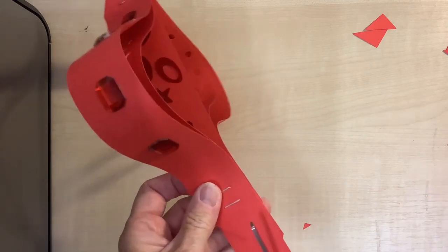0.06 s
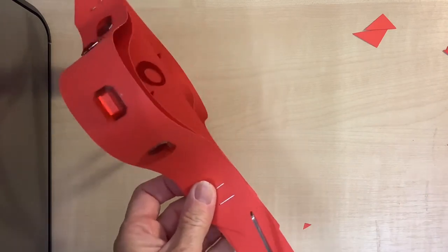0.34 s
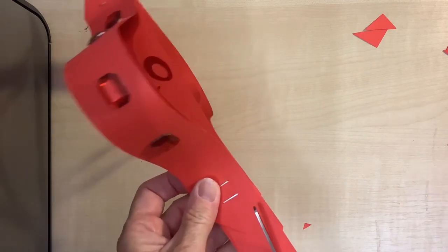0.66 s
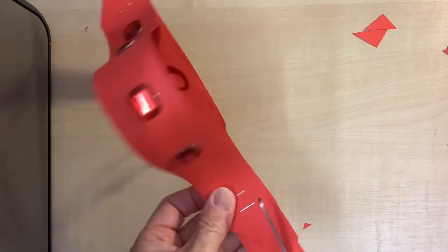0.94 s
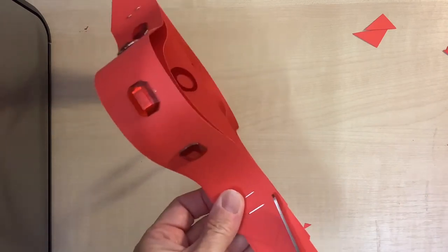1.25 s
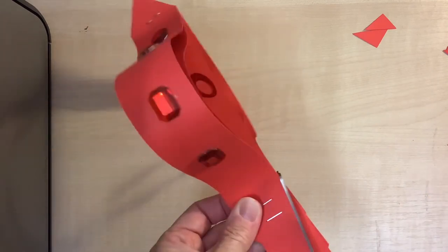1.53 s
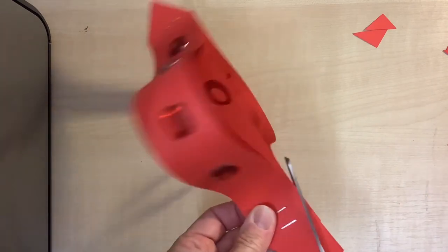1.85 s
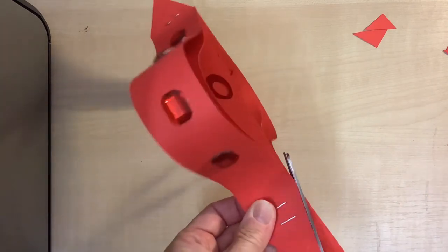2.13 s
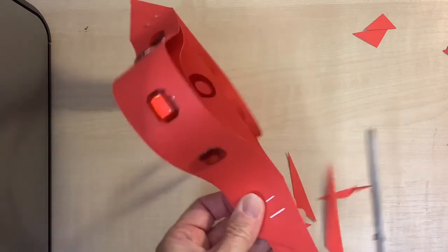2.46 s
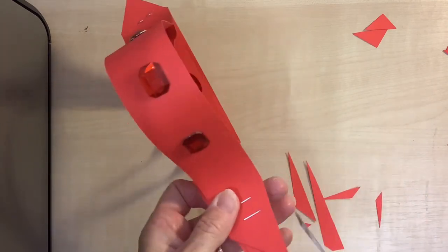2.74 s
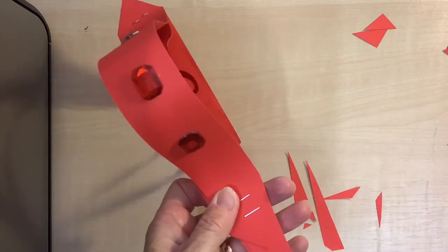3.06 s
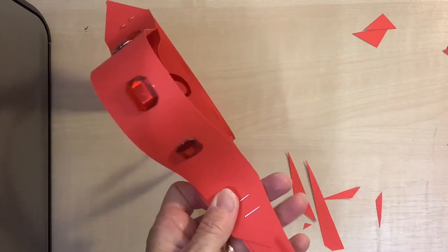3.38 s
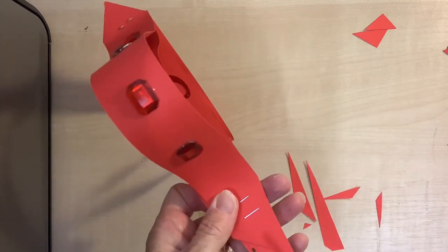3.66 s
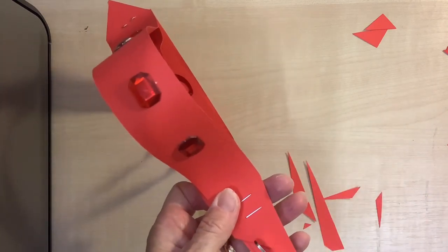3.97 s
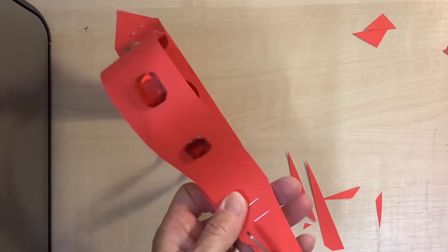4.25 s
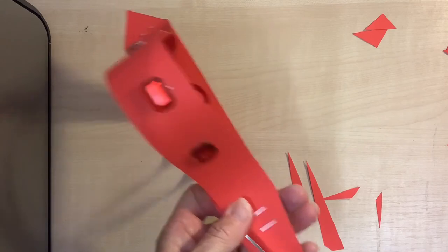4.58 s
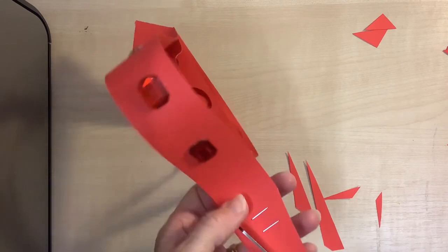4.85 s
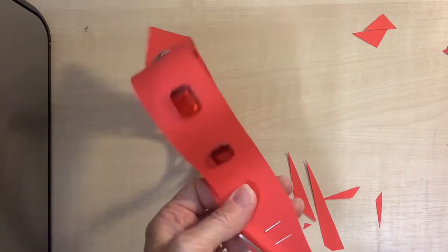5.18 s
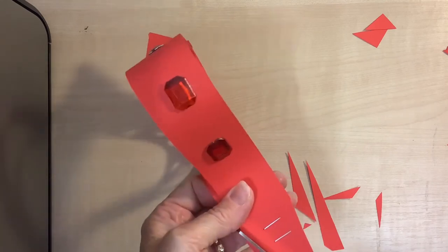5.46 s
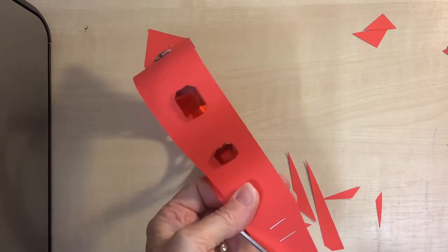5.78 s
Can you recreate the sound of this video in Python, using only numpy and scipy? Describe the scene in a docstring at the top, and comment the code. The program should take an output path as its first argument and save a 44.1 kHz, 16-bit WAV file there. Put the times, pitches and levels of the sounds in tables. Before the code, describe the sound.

Faint, crisp scissor cuts through card and soft finger rubbing, broken by two pairs of sharp metallic clicks, close by.

```python
"""Fingers slide softly over stiff card; then scissors work through it, close by, in a small quiet room.
The rubbing is friction noise, and each cut is a dense stream of fibres failing in shear; both excite
the card's resonances, as does one long, hissing rub between cuts. Stored strain escapes in uneven snaps,
stick-slip motion gives short squeaks, and the hand bumps the card. Twice the blades clack shut and click
open: impacts that set the steel ringing. The walls return a faint tail over a low murmur of air."""
import sys
import numpy as np
from scipy import signal
from scipy.fft import rfft, irfft, next_fast_len
from scipy.io import wavfile
from scipy.ndimage import map_coordinates

SR = 44100
rng = np.random.default_rng(int(sys.argv[2]) if len(sys.argv) > 2 else 0)


def int16_out(signal):
    """Quantize to a 16-bit WAV file."""
    q = np.round(np.clip(np.atleast_2d(signal).T, -1, 1) * 32767)
    wavfile.write(sys.argv[1], SR, q.astype(np.int16))


N = 256220

# Table levels are relative; body (low band) and hiss (high band) are offsets from the event's level.
# finger slides: t/s, rise/s, fall/s, level at full speed/dB, hiss/dB
SLIDES = [(0.0, 0.057, 0.14, -58.5, -8.5), (0.22, 0.007, 0.054, -60, -8), (0.29, 0.087, 0.13, -61, -1.5),
          (1.612, 0.016, 0.0069, -62, -24), (1.986, 0.14, 0.042, -65, -4), (2.2, 0.17, 0.028, -64.5, -8),
          (2.634, 0.034, 0.037, -73.5, -7.5), (3.058, 0.069, .17, -68, -1),
          (3.263, 0.024, 0.023, -71, -32.5), (3.311, 0.15, 0.008, -66.5, -5.5),
          (3.53, 0.055, .01, -74, -17), (3.6, 0.13, 0.063, -70.5, -2), (4.714, 0.027, 0.055, -65, -12),
          (4.955, .055, 0.0098, -65, -12), (5.63, 0.043, 0.022, -58, -6)]
# spectrum of skin rubbing on card: f/Hz, level/dB
SKIN_SPECTRUM = [(240, -36), (400, -12.5), (607, -4), (765, -11), (1380, -3), (1870, -12.5), (2750, -5),
                 (4110, -3), (4440, -5.5), (6540, -7), (9180, -11), (14800, -20.5), (16000, -22.5)]
# resonances of the card under the fingers: f/Hz, bandwidth/Hz, level/dB
HELD_CARD_MODES = [(2600, 260, -10), (4670, 140, 9.5), (5710, 420, -6.5), (8400, 200, -10.5),
                   (8900, 650, -7.5)]
# bumps of the hand on the card: t/s, level/dB
BUMPS = [(0.188, -53.5), (1.749, -52.5), (2.022, -60.5), (2.135, -43.5), (5.505, -48.5)]
# spectrum of a bump: f/Hz, level/dB
BUMP_SPECTRUM = [(35, -18), (60, -10.5), (110, -5), (300, -5), (750, -3), (1200, -14.5), (3000, -37)]
# cutting strokes, and at 3.64 s one long, soft, hissing rub of blade or fingers on the card:
# t/s, rise/s, fall/s, onset/dB re full speed, level at full speed/dB, body/dB, hiss/dB,
# tick as the contact seats/dB re level
CUTS_AND_RUB = [(0.51, 0.056, 0.018, -5, -59, -7, 2, -33), (0.603, .035, 0.015, -6, -54.5, -4, -2, -0.5),
                (0.75, 0.047, 0.12, -6, -50, -10, -2.5, -19),
                (1.011, 0.055, 0.064, -2, -47.5, -7.5, -7, -12),
                (1.272, 0.061, 0.045, -10, -47, -13.5, -3, -26),
                (1.386, .075, 0.024, -6, -61.5, -15, -8, -22),
                (1.511, 0.04, 0.032, 10.5, -55.5, -14.5, -14, -12),
                (1.71, 0.069, 0.013, -1.5, -45, -13, -7.5, -27),
                (1.851, 0.096, 0.011, -5, -61, -16, -5.5, -20),
                (2.352, 0.068, 0.013, -8.5, -56, -11, -1.5, -20),
                (2.529, 0.041, 0.018, -8.5, -56.5, -11.5, -8, -10.5),
                (3.64, 0.22, 0.017, -16.5, -60, -12.5, 4.5, -31),
                (4.018, 0.085, 0.021, -10, -49, -14.5, -2, -22),
                (4.211, 0.057, 0.074, -13, -50.5, -11.5, 0, -13),
                (4.493, 0.064, 0.0119, -4, -46.5, -12, 0, -30),
                (4.581, 0.038, 0.039, -8, -61.5, -7, -8, -22.5),
                (4.785, .055, 0.067, -4, -53.5, -19, -3, -15),
                (5.056, 0.037, 0.051, -6.5, -45.5, -12.5, -0.5, -18)]
# spectrum of the cuts and the long rub: f/Hz, level/dB
CUT_AND_RUB_SPECTRUM = [(120, -67), (200, -14.5), (432, -14.5), (560, -9), (850, -8.5), (1150, -6.5),
                        (1560, -9.5), (1710, -8.5), (2050, -10.5), (2560, 0), (3020, -8), (3190, 0),
                        (5840, 0), (6520, -3.5), (13300, -10), (16000, -21)]
# resonances of the card between the blades: f/Hz, bandwidth/Hz, level/dB
CARD_MODES = [(1837, 20, 13), (2520, 43, 2.5), (3300, 20, 3), (3960, 38, -3), (4303, 320, 9.5),
              (4890, 480, 25), (5920, 170, 18), (6920, 98, -17), (7806, 190, 7), (8700, 87, -2),
              (9850, 75, -3.5), (10570, 24, 1.5)]
# the card gives way: t/s, level/dB, body/dB, hiss/dB, number of jerks in the run
SNAPS = [(0.609, -50.5, -4, -4, 1), (0.621, -46.5, -3.5, -4, 2), (0.6659, -56, -5, 0.5, 1),
         (0.9352, -54.5, 4, 1.5, 1), (1.02, -46, -5.5, -7, 1), (1.048, -40, -3, -4.5, 1),
         (1.081, -44, -12, -8, 1), (1.1152, -42.5, -7, -6, 2), (1.151, -44, -0.5, -4.5, 1),
         (1.267, -49.5, -11, -6, 1), (1.418, -56.5, -17, -5, 1), (1.455, -48, -7.5, -4, 2),
         (1.4872, -51.5, -21, -6, 1), (1.5105, -45, -11, -5, 1), (1.537, -43.5, -4.5, 0, 4),
         (1.7019, -49.5, -29, -6, 1), (1.745, -35, -1, -8, 1), (1.761, -45, -9, 4, 1),
         (1.8385, -52, -13, -13, 1), (1.9096, -47.5, -6.5, -7, 1), (1.9261, -45.5, -10, -5, 1),
         (1.9747, -39.5, -5.5, -6, 1), (2.0229, -35, -6, -11, 1), (2.0635, -43.5, -7, -6, 1),
         (2.107, -56, -22, -11, 1), (2.127, -37, -24, -10, 1), (2.2338, -56.5, -18, -13, 1),
         (2.272, -51.5, -10.5, -2, 1), (2.2983, -64, -5, 13, 1), (2.399, -46, -11.5, -18, 1),
         (2.564, -48, -13, -8, 1), (2.6674, -65, -4, -11, 1), (2.777, -76, -8, -16, 1),
         (3.845, -53, -6.5, 3, 1), (3.862, -54, -2.5, 0, 1), (4.0166, -50.5, -12.5, -5, 1),
         (4.3165, -48, -4, -11, 1), (4.329, -42, -9, -8, 1), (4.604, -50, -5.5, -2.5, 1),
         (4.693, -50, -1.5, -1.5, 1), (5.059, -52.5, 5, -3, 1), (5.233, -49, -9.5, -9, 1),
         (5.257, -62, -5, -22, 1), (5.3279, -46.5, -2, -3.5, 1), (5.3502, -49.5, -3, 1, 1),
         (5.3794, -46.5, -5, 2.5, 1), (5.386, -47, 0, 4, 1), (5.4183, -41.5, 2.5, -0.5, 4),
         (5.482, -44, -5, -10, 1), (5.4868, -37, -1, -8, 1), (5.666, -53, -15, 5, 1),
         (5.711, -59.5, -2.5, -12, 1), (5.757, -54, 1, -5, 1)]
# spectrum of a snap: f/Hz, level/dB
SNAP_SPECTRUM = [(120, -39), (200, -5.5), (340, -14), (600, 0.5), (1300, -1), (2050, -9), (2510, 0),
                 (4430, 3.5), (4950, 3), (5730, 0), (6520, -2.5), (8580, -3), (12200, -11), (13100, -10),
                 (16000, -16.5)]
# the card catches on a blade: t/s, f/Hz, level/dB, duration/s
SQUEAKS = [(0.933, 2940, -45, 0.0036), (1.008, 1710, -56, 0.023), (1.048, 1790, -45.5, 0.014),
           (1.151, 1350, -49, 0.0063), (1.745, 1120, -33.5, 0.0044), (3.281, 4370, -65, 0.023),
           (5.066, 1083, -50.5, 0.017), (5.255, 1610, -57, 0.0023), (5.768, 2560, -41.5, 0.00073)]
# the blades clack shut: t/s, level/dB, body/dB, hiss/dB, ring/dB, contact time/s
SHUTS = [(2.1323, -14.5, -3, -1, -5, 0.0012), (5.5018, -17.5, -4, -4.5, -11.5, 0.0031)]
# spectrum of the clack: f/Hz, level/dB
CLACK_SPECTRUM = [(71, -75), (120, -27.5), (348, -26), (680, -1), (1430, -5.5), (1580, -25), (1750, -8.5),
                  (3170, -7), (3380, -2), (3660, -13), (5410, 1.5), (6370, -5.5), (6910, -7.5), (11800, -5),
                  (16000, -10.5)]
# modes of the closed scissors: f/Hz, level/dB, t60 before the hand's damping/s
CLOSED_MODES = [(978, -5.5, 0.069), (2500, -5, .05), (3416, -3, 0.045), (4306, 0.5, .07), (4806, -2.5, .07),
                (5100, -10.5, .06), (5250, -4, .06), (5660, -1.5, .07), (5530, -4, .06),
                (6250, -2.5, 0.056), (7180, 1, .05), (8500, -1.5, .07), (8660, -4, .06), (9340, -3, .07),
                (8930, 2, .05), (9700, -8.5, .05), (11100, -1.5, .05)]
# the blades click apart: t/s, level/dB, body/dB, hiss/dB, ring/dB, contact time/s
PARTINGS = [(2.3107, -10, -3, -8, -11.5, 0.0011), (5.7802, -9, -0.5, -7.5, -10.5, 0.0021)]
# spectrum of the click: f/Hz, level/dB
CLICK_SPECTRUM = [(150, -72), (250, -32), (1400, -22), (1820, -11), (2200, -24), (2670, -9.5), (3460, -19),
                  (4820, -5), (5250, -14.5), (6080, -4.5), (6600, -20), (8850, -1), (9660, -13),
                  (14400, -4.5), (16000, 6)]
# modes of the parted scissors: f/Hz, level/dB, t60 before the hand's damping/s
PARTED_MODES = [(2586, -5, 0.01), (2940, -6, 0.025), (4784, -4, 0.039), (5680, -16, 0.055),
                (6100, -7, 0.028), (6850, -4, 0.02), (8710, -7, 0.019), (10230, -8, 0.023),
                (13200, -13, 0.064), (15000, -18, 0.03), (14810, -20, 0.03)]
# reverberation time of the room: f/Hz, t60/s
ROOM_T60 = [(150, .35), (1000, 0.28), (5000, 0.43), (15000, 0.1)]
# spectrum of the room's air: f/Hz, level/dB
AIR_SPECTRUM = [(20, -21), (50, -4.5), (113, -7.5), (142, -9), (172, -13), (234, -13), (301, -16),
                (377, -15), (499, -18.5), (624, -17.5), (698, -25.5), (1150, -31.5), (6360, -39.5),
                (9140, -35.5), (16000, -43)]


def amp(db):
    """Amplitude ratio of a level in decibels."""
    return 10 ** (np.asarray(db) / 20)


def unit(x):
    """Normalisation to rms 1."""
    return x / np.sqrt(np.mean(x ** 2) + 1e-20)


def along(points, hz):
    """Interpolation of (f/Hz, value) points on a logarithmic frequency axis."""
    f, v = np.transpose(points)
    return np.interp(np.log(hz + 1), np.log(f + 1), v)


def wobble(rate):
    """Smooth random modulation: a spline through `rate` knots a second."""
    return map_coordinates(rng.standard_normal(int(N * rate / SR) + 4), [np.arange(N) * rate / SR])


def filtered(x, response):
    """Linear filtering: the spectrum of x times a frequency response."""
    size = next_fast_len(len(x) + 8192)
    return irfft(rfft(x, size) * response(np.fft.rfftfreq(size, 1 / SR)), size)[:len(x)]


def coloured(x, spectrum):
    """Spectral shaping by a broad envelope, at rms 1."""
    return unit(filtered(x, lambda hz: amp(along(spectrum, hz))))


def resonant(x, modes):
    """Modal superposition: x drives second-order resonators of alternating sign; the sum has rms 1."""
    def response(f):
        return sum((-1) ** k * amp(db) * 1j * f * width / (centre ** 2 - f ** 2 + 1j * f * width)
                   for k, (centre, width, db) in enumerate(modes))
    return unit(filtered(x, response))


def registers(x, body_hz=1750, hiss_hz=8500):
    """Complementary filters split x into card body, middle and edge hiss."""
    body = filtered(x, lambda hz: 1 / (1 + (hz / body_hz) ** 10))
    hiss = filtered(x, lambda hz: 1 - 1 / (1 + (hz / hiss_hz) ** 10))
    return body, x - body - hiss, hiss


def even_noise(size):
    """White noise of flat magnitude and random phase."""
    return unit(irfft(np.exp(2j * np.pi * rng.random(size // 2 + 1)), size))


def fade(t, rise, hold, t60):
    """Contact envelope: exponential growth, then exponential decay after `hold`; times in seconds."""
    return (1 - np.exp(-t / rise)) * amp(-60 * np.maximum(t - hold, 0) / t60)


def gesture(start, rise, fall, start_db, end_db, t60, edge):
    """Sample indices, gate and speed of a movement; speed/dB is parabolic either side of 0 at `rise`."""
    span = np.arange(max(0, int(start * SR)), min(N, int((start + rise + fall + t60) * SR)))
    t = (span - span[0]) / SR
    approach_db = start_db * np.clip(1 - t / rise, 0, 1) ** 2
    easing_db = end_db * np.clip((t - rise) / fall, 0, 1) ** 2
    return span, fade(t, edge, rise + fall, t60), approach_db + easing_db


def add(track, start, sound):
    """Superposition of a sound on the track at `start` seconds."""
    part = track[round(start * SR):][:len(sound)]
    part += sound[:len(part)]


def fibres(rate, spread_db, clump_db, clump_rate):
    """Shot noise: `rate` tiny impulses a second, uneven in size and swelling in clumps."""
    impulses = (rng.random(N) < rate / SR) * rng.standard_normal(N)
    return unit(impulses * amp(spread_db * rng.standard_normal(N) + clump_db * wobble(clump_rate)))


def sheet(x, t60, tail_db, size=4096):
    """Multipath spreading: bending waves in the card smear each impulse, anew as the contact moves."""
    hop = size // 2
    padded = np.pad(x, (hop, size))
    window = np.sqrt(signal.get_window("hann", size))
    frames = np.lib.stride_tricks.sliding_window_view(padded, size)[::hop] * window
    responses = rng.standard_normal((len(frames), hop)) * amp(-60 * np.arange(hop) / SR / t60)
    responses *= amp(tail_db) / np.linalg.norm(responses, axis=1, keepdims=True)
    responses[:, 0] += 1  # direct path
    out = np.zeros(len(padded))
    for k, frame in enumerate(signal.fftconvolve(frames, responses, axes=1)):
        add(out, k * hop / SR, frame)
    return out[hop:hop + N]


def fingers(level_db=-2, ring_db=-2):
    """Sliding friction: fine contacts of skin on card excite its resonances, louder with speed."""
    grain = fibres(rate=16000, spread_db=2, clump_db=1.2, clump_rate=120)
    grain = sheet(grain, t60=0.042, tail_db=6.0)
    friction = coloured(grain, SKIN_SPECTRUM) + amp(ring_db) * resonant(grain, HELD_CARD_MODES)
    body, middle, hiss = registers(friction)
    rub, hiss = (body + middle) / np.std(middle), unit(hiss)
    out = np.zeros(N)
    for start, rise, fall, db, hiss_db in SLIDES:
        span, gate, speed_db = gesture(start, rise, fall, start_db=-7, end_db=-1.5,
                                       t60=0.029, edge=0.0035)
        out[span] += gate * amp(db + level_db + speed_db) * (rub[span] + amp(hiss_db) * hiss[span])
    return out


def bumps():
    """Soft impact: the hand knocks the card, and the yielding contact excites mainly low frequencies."""
    out, t = np.zeros(N), np.arange(4096) / SR
    envelope = fade(t, rise=0.00088, hold=0.0051, t60=0.072)
    for start, db in BUMPS:
        add(out, start, amp(db) * coloured(even_noise(len(t)), BUMP_SPECTRUM) * envelope)
    return out


def cuts_and_rub(ring_db=-5):
    """Shear fracture of fibres in the cuts, friction in the one long rub: louder and brighter with speed."""
    body_slope, hiss_slope = -0.41, 0.74  # dB re the middle band, per dB of speed
    grain = fibres(rate=11000, spread_db=2, clump_db=1.3, clump_rate=320)
    grain = sheet(grain, t60=0.053, tail_db=4.5)
    rasp = coloured(grain, CUT_AND_RUB_SPECTRUM) + amp(ring_db) * resonant(grain, CARD_MODES)
    body, middle, hiss = map(unit, registers(rasp))
    out = np.zeros(N)
    for start, rise, fall, onset_db, db, body_db, hiss_db, _ in CUTS_AND_RUB:
        span, gate, speed_db = gesture(start, rise, fall, onset_db, end_db=-9, t60=0.13, edge=0.00069)
        flex = amp(body_db + body_slope * speed_db) * body[span]
        fizz = amp(hiss_db + hiss_slope * speed_db) * hiss[span]
        out[span] += gate * amp(db + speed_db) * (middle[span] + flex + fizz)
    return out


def jerks(run_gap_s=0.0145, doubling_db=-8, seat_lead_s=0.014):
    """Intermittent fracture in fading runs, seating ticks and strays: t/s, level/dB, body/dB, hiss/dB."""
    stray_rate_hz, stray_db, scatter_db, slots = 20, -6.5, 3, 8
    small_body_db, small_hiss_db = -6, -4
    for start, db, body_db, hiss_db, count in SNAPS:
        for k in range(round(count)):
            yield start + k * run_gap_s, db + doubling_db * np.log2(k + 1), body_db, hiss_db
    for start, rise, fall, _, db, _, _, seat_db in CUTS_AND_RUB:
        yield start - seat_lead_s, db + seat_db, small_body_db, small_hiss_db
        chance, place = rng.random((2, slots))
        sizes = rng.standard_normal(slots)
        for k in np.flatnonzero(chance < stray_rate_hz * (rise + fall) / slots):
            when = start + rise / 2 + place[k] * (rise / 2 + fall)
            yield when, db + stray_db + scatter_db * sizes[k], small_body_db, small_hiss_db


def snaps(level_db=2, body_trim_db=-1, ring_db=-6, strain_db=-17, spike_db=2.5, lead_s=0.003):
    """Strain release: a few fibres part, then the bundle cracks; low bending waves swell later."""
    out, clock = np.zeros(N), np.arange(2048) / SR - lead_s
    t = np.maximum(clock, 0)
    strain = amp(strain_db) * (clock < 0) * (1 + clock / lead_s)
    for start, db, body_db, hiss_db in jerks():
        breaks = unit(even_noise(len(t)) * amp(spike_db * rng.standard_normal(len(t))))
        burst = coloured(breaks, SNAP_SPECTRUM) + amp(ring_db) * resonant(breaks, CARD_MODES)
        body, middle, hiss = map(unit, registers(burst))
        crack = middle * (strain + fade(t, rise=0.00016, hold=0.0022, t60=0.042))
        fizz = amp(hiss_db) * hiss * (strain + fade(t, rise=0.00033, hold=0.0018, t60=0.036))
        flex = amp(body_db + body_trim_db) * body * fade(t, rise=0.0013, hold=0.0018, t60=0.036)
        add(out, start - lead_s, amp(db + level_db) * (crack + fizz + flex))
    return out


def squeaks(q_factor=11):
    """Stick-slip excitation: uneven catching on a blade briefly drives one resonance of the card."""
    out, t = np.zeros(N), np.arange(4096) / SR
    for start, hz, db, duration in SQUEAKS:
        envelope = fade(t, rise=0.001, hold=duration, t60=0.035)
        squeak = resonant(even_noise(len(t)), [(hz, hz / q_factor, 0)]) * envelope
        add(out, start, amp(db) * squeak * np.linalg.norm(envelope) / np.linalg.norm(squeak))
    return out


def blade_hits(hits, spectrum, modes, hiss_t60, scrape_db, lead_s=0.005, grip_t60=0.052):
    """Hard impact of steel on steel: a scrape, a crack, then free vibration damped by the hand's grip."""
    out, clock = np.zeros(N), np.arange(4096) / SR - lead_s
    t = np.maximum(clock, 0)
    scrape = amp(scrape_db) * (clock < 0) * (1 + clock / lead_s)
    spike = 1 + 1.4 * np.exp(-t / 0.0009)  # the sharp first touch
    for start, db, body_db, hiss_db, ring_db, contact in hits:
        body, middle, hiss = registers(coloured(even_noise(len(t)), spectrum))
        crack = middle * (scrape + fade(t, rise=0.00022, hold=contact, t60=0.036))
        fizz = amp(hiss_db) * hiss * (scrape + spike * fade(t, rise=0.00015, hold=contact, t60=hiss_t60))
        flex = amp(body_db) * body * fade(t, rise=0.0005, hold=0.0027, t60=0.03)
        ring = np.zeros(len(t))
        for hz, mode_db, t60 in modes:
            envelope = fade(t, rise=0.00036, hold=contact, t60=min(t60, grip_t60))
            ring += amp(mode_db) * np.sin(2 * np.pi * (hz * t + rng.random())) * envelope
        ring = amp(ring_db) * np.std(crack + fizz) * unit(ring)
        add(out, start - lead_s, amp(db) * (crack + fizz + flex + ring))
    return out


def room(x, build_up_s=0.0024):
    """Reverberation: wall reflections form a diffuse tail that dies fastest in the highest treble."""
    hz, t, noise = signal.stft(rng.standard_normal(SR // 2), SR, nperseg=256)
    decay = amp(-60 * t / along(ROOM_T60, hz)[:, None])
    tail = signal.istft(noise * decay, SR, nperseg=256)[1]
    tail *= 1 - np.exp(-np.arange(len(tail)) / SR / build_up_s)
    tail = coloured(tail, [(150, 3.0), (1000, -9.5), (5000, -15.5), (15000, -5.5)])  # f/Hz, level/dB
    return signal.fftconvolve(x, tail / np.linalg.norm(tail))[:N]


def scene():
    """Superposition of direct sound, faint reverberation and the murmur of air, in one channel."""
    direct = fingers() + bumps() + cuts_and_rub() + snaps() + squeaks()
    direct += blade_hits(SHUTS, CLACK_SPECTRUM, CLOSED_MODES, hiss_t60=0.035, scrape_db=-29.5)
    direct += blade_hits(PARTINGS, CLICK_SPECTRUM, PARTED_MODES, hiss_t60=0.031, scrape_db=-13)
    air = amp(-69) * coloured(rng.standard_normal(N), AIR_SPECTRUM)
    return (direct + amp(-20) * room(direct) + air)[None]


def record(dry):
    """Band limiting: the microphone sheds the deepest bass, and a steep low-pass cuts the top treble."""
    low_hz, top_hz = 33, 15750

    def passband(hz):
        return (1 - 1 / (1 + (hz / low_hz) ** 6)) / (1 + (hz / top_hz) ** 120)
    return np.array([filtered(x, passband) for x in dry])


dry = scene()
out = record(dry)
int16_out(out)
```